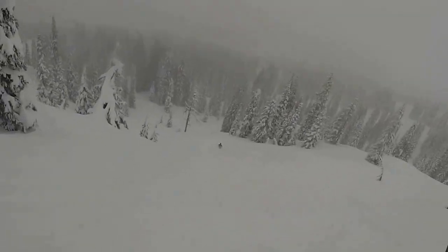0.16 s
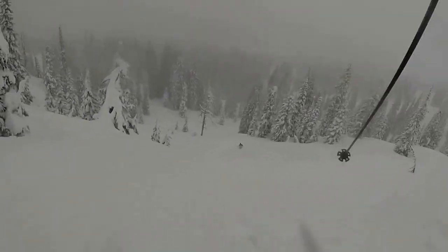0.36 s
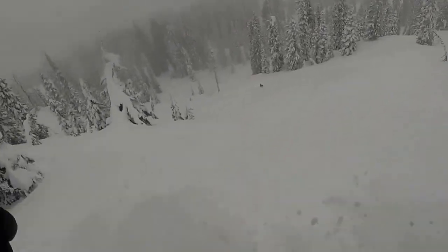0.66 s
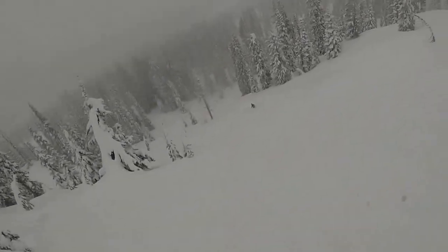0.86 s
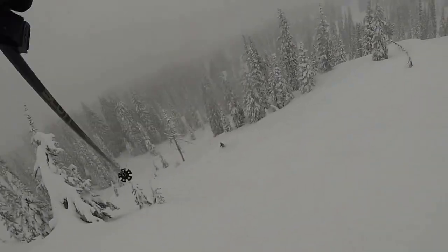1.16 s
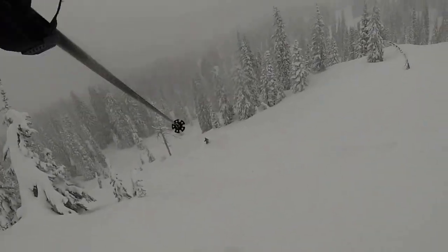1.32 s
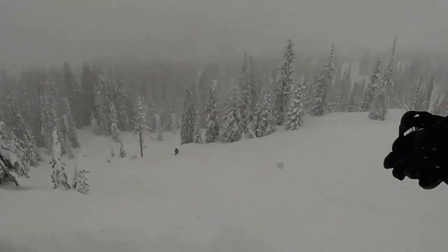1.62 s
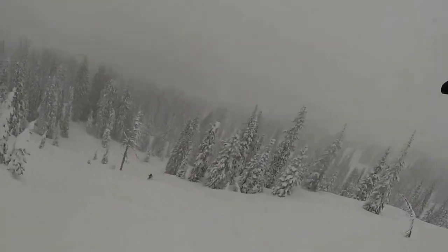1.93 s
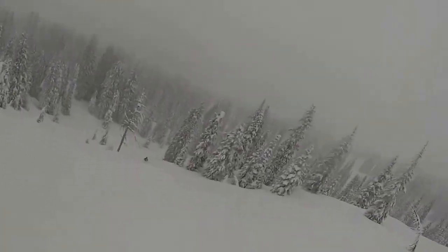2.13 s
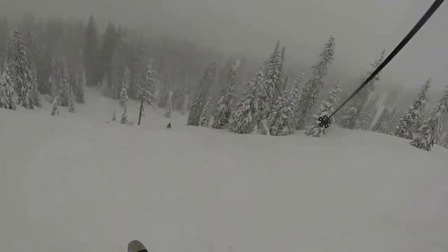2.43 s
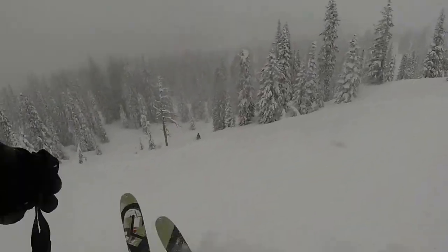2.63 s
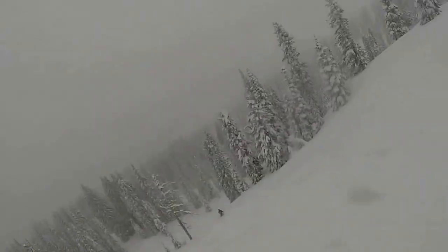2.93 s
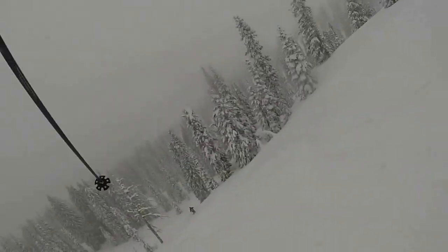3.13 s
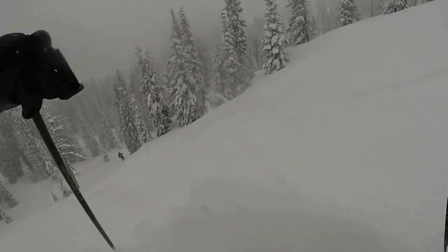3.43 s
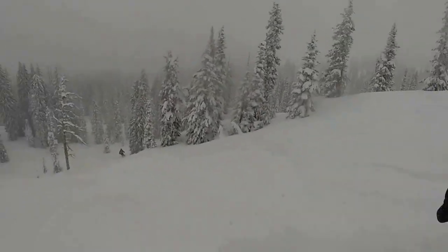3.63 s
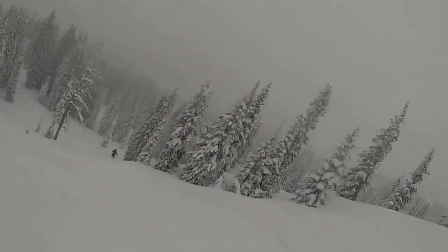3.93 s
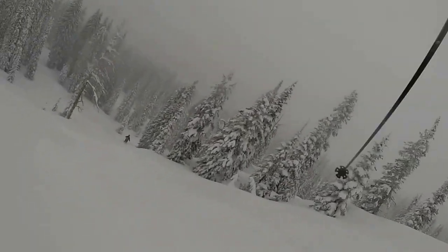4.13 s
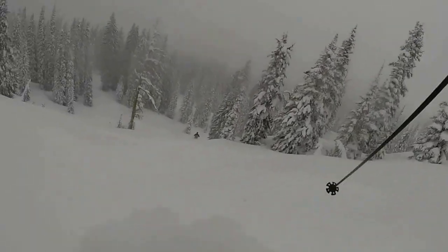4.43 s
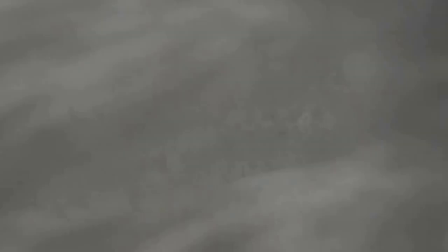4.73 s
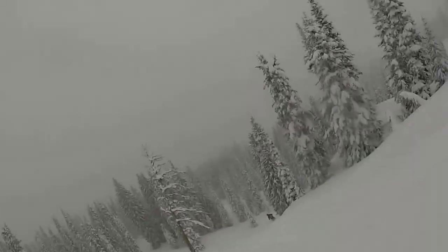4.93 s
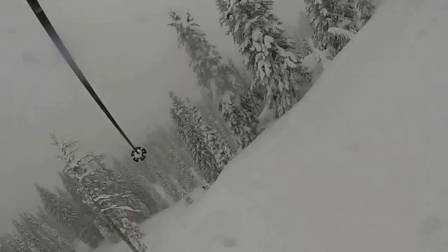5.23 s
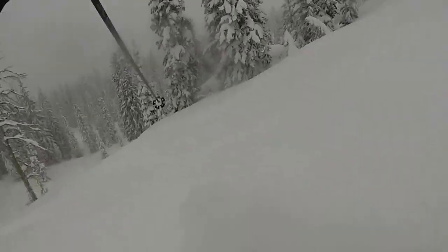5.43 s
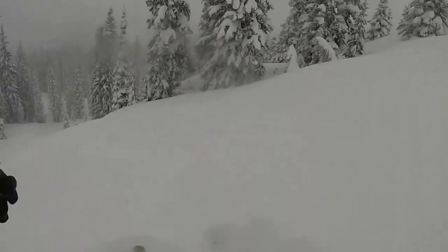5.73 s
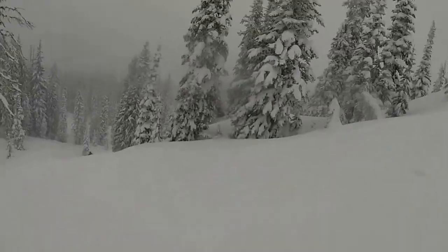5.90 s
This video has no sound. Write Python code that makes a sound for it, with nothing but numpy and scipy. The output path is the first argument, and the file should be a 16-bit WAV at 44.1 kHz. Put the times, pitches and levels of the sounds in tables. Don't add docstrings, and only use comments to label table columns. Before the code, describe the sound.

Close, boxy sound from inside a plastic case on a skier's helmet. Low wind buffets and flutters while skis swish softly through powder. Tiny icy ticks scatter throughout. A loud, dry knock from the loose mount comes about once a second, briefly ducking everything. Snow sprays hiss and patter near two, three and, strongest, just before five seconds, with soft thuds.

```python
import sys
import numpy as np
from scipy import signal
from scipy.fft import rfft, irfft
from scipy.io import wavfile
from scipy.ndimage import uniform_filter1d

SR = 44100
rng = np.random.default_rng(int(sys.argv[2]) if len(sys.argv) > 2 else 0)


def pcm_store(signal):
    levels = np.round(np.clip(np.atleast_2d(signal), -1, 1) * 32767)
    wavfile.write(sys.argv[1], SR, levels.astype(np.int16).T)


def invert_db(x):
    u = np.asarray(x, float) / 20
    return 10 ** u


N = 267246
TIME = np.arange(N) / SR

# (time [s], level [dB])
WIND = [(0, -28.5), (.47, -44.5), (.61, -26), (.78, -29.5), (.97, -40.5), (1.14, -36), (1.7, -36),
        (2.1, -39), (2.68, -38), (2.9, -30.5), (3.2, -31.5), (3.55, -47), (3.83, -33), (4.5, -43.5),
        (4.9, -25), (5.3, -32), (5.7, -42.5), (6.06, -30)]
# (time [s], hold [s], level [dB])
PUFFS = [
    (1.72, 0.12, -28),
    (2.42, 0.056, -27),
    (2.86, .04, -25.5),
    (4.12, 0.14, -32.5),
    (4.5, 0.064, -34.5),
    (5.27, .03, -26),
    (5.49, 0.068, -34),
    (5.81, 0.022, -35),
    (5.95, .02, -34),
]
# (time [s], level [dB])
HEAD_SHAKE = [(0, -54), (.2, -61), (.47, -52.5), (.97, -50), (1.37, -51), (1.62, -61), (2.09, -48),
              (2.3, -43.5), (2.5, -65), (2.83, -50), (3.25, -43), (3.55, -65), (3.73, -51), (4.25, -51),
              (4.59, -57), (5.0, -46.5), (5.28, -46), (5.55, -58), (5.89, -51), (6.06, -31.5)]
# (time [s], hold [s], boom level [dB], flutter level [dB])
JOLTS = [(0, 0.012, -25, -35.5), (2, 0.011, -35, -55), (1.85, 0.0088, -37.5, -40), (3, 0.03, -33, -39),
         (3.02, 0.015, -32.5, -57), (3.83, 0.013, -60, -47), (4, 0.022, -46, -45), (4.76, 0.12, -33.5, -38),
         (5.0, 0.12, -33, -43), (5, 0.021, -34.5, -48), (1.5, .02, -45, -49), (2.21, 0.016, -48, -50),
         (2.5, 0.026, -37, -43.5), (5.5, 0.038, -32, -43.5), (6, .05, -36, -38.5), (5, 0.034, -42, -44),
         (3.5, 0.026, -48.5, -56), (1.9, 0.035, -44, -44.5)]
# (time [s], swish level [dB])
SKI_PRESSURE = [(0, -38.5), (.17, -53), (.5, -47.5), (.9, -46.5), (1.3, -46.5), (1.85, -44), (2.3, -40),
                (2.5, -51.5), (2.85, -48.5), (3.2, -44), (3.55, -49), (3.75, -43), (4.24, -46.5),
                (4.67, -40.5), (5.2, -36), (5.5, -41), (5.87, -49), (6.03, -44)]
# (time [s], hold [s], swish level [dB], patter level [dB])
SPRAYS = [(.42, 0.021, -52, -53), (.545, 0.072, -41.5, -58), (.86, 0.019, -57, -54),
          (1.18, 0.023, -41, -58), (1.53, 0.013, -45, -52), (1.882, 0.046, -31, -29),
          (1.95, 0.072, -45, -39), (2.16, 0.056, -47, -43), (2.39, 0.0078, -29, -54),
          (2.66, .03, -44.5, -68), (2.765, 0.017, -44, -52), (2.892, 0.08, -30, -32.5),
          (3.1, 0.043, -36.5, -38), (3.15, 0.074, -42, -42.5), (3.33, 0.0095, -39, -64),
          (3.58, 0.0083, -39.5, -44), (3.632, 0.055, -40, -36.5), (3.75, 0.27, -57, -44),
          (4.0, 0.15, -40.5, -36), (4.17, 0.06, -43.5, -41), (4.33, 0.0098, -47, -62),
          (4.41, 0.068, -40, -64), (4.545, 0.017, -41, -52), (4.716, 0.012, -24, -27),
          (4.733, 0.1, -26.5, -24.5), (4.925, 0.034, -28.5, -25), (5.1, 0.29, -61, -39.5),
          (5.4, 0.081, -54, -42.5), (5.67, 0.068, -48, -42.5), (5.94, 0.12, -46.5, -71)]
# (time [s], hold [s], swish level [dB], patter level [dB])
SURGES = [(1.915, 0.017, -35, -33.5), (2.062, 0.014, -48, -43), (2.905, .012, -32, -27.5),
          (2.938, .008, -35, -29), (4.738, .016, -24, -20), (4.767, 0.014, -26, -25),
          (4.806, 0.018, -22.5, -19.5), (4.856, 0.011, -26.5, -24.5), (4.878, .025, -35, -34),
          (4.924, .012, -27, -21.5), (4.964, .022, -33, -28.5), (3.0, 0.064, -40, -42)]
# (frequency [Hz], width [Hz], level [dB])
CAVITIES = [(900, 1460, -4), (1760, 580, 1.1), (2570, 920, -2.5), (3250, 690, -1.6), (4160, 250, -6),
            (5140, 580, -3.5), (6130, 660, -7.5), (8930, 1300, -7.5), (11000, 4400, -3), (13800, 4700, -18)]
# (time [s], peak level [dB], frequency [Hz], t60 [s])
CLODS = [(.616, -24, 424, 0.026), (2.962, -9, 174, 0.043), (2.987, -0.5, 194, 0.016),
         (3.728, -15.5, 185, 0.041), (4.824, -8.5, 124, 0.036), (4.9519, 11.5, 142, 0.023),
         (5.514, -24.5, 393, 0.038), (0, -24, 302, .02), (.744, -34, 400, .02), (1.12, -33, 400, .02),
         (1.762, -31, 400, 0.022), (2.016, -30, 352, .02), (2.134, -26, 450, 0.024),
         (2.17, -31, 366, 0.023), (2.222, -21, 423, 0.023), (2.327, -22, 454, .015),
         (2.404, -36, 330, 0.025), (2.694, -38, 330, .02), (2.913, -23, 350, .02), (3.006, -22, 300, .02),
         (3.73, -28, 860, .012), (3.819, -21.5, 345, 0.018), (3.834, -27, 400, 0.023),
         (3.893, -30, 377, .02), (3.955, -26, 380, .02), (4.03, -33, 353, 0.016), (4.475, -36, 600, .015),
         (4.617, -39, 400, .02), (4.674, -37, 800, .012), (4.73, -21, 350, .02), (5.015, -26, 280, .02),
         (5.33, -27, 380, 0.023), (5.729, -32, 400, 0.025), (5.831, -24, 398, 0.023),
         (4.425, -35, 650, .02), (4.437, -35, 1450, .015), (4.446, -32, 800, .02), (5.518, -34, 760, .015),
         (.297, -42, 900, .02), (5.93, -33, 930, 0.019), (5.996, -21, 497, .02), (6.048, -12, 2000, 0.0093)]

# (frequency [Hz], level [dB], t60 [s])
TICK_LOW_MODES = [(1710, -17, 0.0081), (2940, -19, 0.011), (4320, -9, 0.0036), (5400, -11, 0.0036)]
TICK_HIGH_MODES = [(6330, -6, 0.0037), (8560, 3.5, 0.0026), (11040, -2, 0.0028), (13700, -6, 0.0028)]
# (time [s], peak level [dB], brightness [dB])
LENS_TICKS = [(0.5493, -33, -6), (.6743, -27.5, -19), (.698, -27.5, -21), (.7673, -25.5, -13),
              (0.871, -40, -11), (1.2709, -30.5, -9), (1.2913, -25, -19), (1.3466, -19.5, -14),
              (1.5552, -31, -20), (1.7344, -28, -9.5), (1.875, -34, -5), (2.0401, -22, -11.5),
              (2.199, -21.5, -19), (2.546, -26.5, -22), (2.7304, -30.5, -25), (2.7545, -34, -14),
              (2.7577, -22.5, -10), (2.9093, -19, -14), (2.9438, -18.5, -13), (2.9753, -12, -9),
              (2.9761, -13, -12), (3.0787, -26.5, -7), (3.0963, -30, -28), (3.103, -28.5, -19),
              (3.195, -28.5, -6), (3.226, -30, -9), (3.5804, -26.5, -23), (3.655, -26.5, -12),
              (3.826, -30, -27), (3.961, -28.5, -15), (3.9897, -27, -14), (4.3421, -29.5, -10),
              (4.3163, -37.5, -6), (4.472, -30, -14), (4.6621, -25.5, -22), (4.7214, -16, -12),
                   (4.7235, -18, -14), (5.1797, -30.5, -1), (5.2385, -18, -10), (5.4746, -28, -24),
                   (5.799, -32, -9), (5.887, -47, 4), (4.398, -42, -20)]
# (time [s], peak level [dB], brightness [dB])
WALL_TICKS = [(0.0235, -31.5, -5), (0.045, -32, -7), (.248, -43, -3), (.3757, -35.5, -15),
              (0.5335, -34, -11), (.5564, -38, -1.5), (.7153, -40, -1), (0.9076, -32, -16),
              (.954, -30, -15), (1.1504, -33.5, -4.5), (1.183, -28, -11), (1.19, -43, -13),
              (1.2126, -33.5, -17), (1.503, -30.5, -7.5), (1.625, -34.5, -14), (2.1011, -25, -13),
              (2.322, -32, -2), (2.3487, -33, -23), (2.38, -42, -4), (2.86, -27, -14), (2.8995, -25, -11),
              (4.0104, -22, -29), (4.2868, -34, -8), (4.2977, -37, -8), (4.423, -38, -2), (4.579, -30, -5),
              (4.644, -31, -12), (4.705, -26, -4), (4.8577, -18.5, -21), (5.728, -33, -2)]
# (time [s], peak level [dB], brightness [dB])
DOOR_TICKS = [(0.6238, -36, -24), (0.7325, -34, -20), (.747, -30, -15), (1.3097, -37, -15),
              (1.405, -39, -22), (1.8, -36, -8), (1.33, -41, -18), (0.293, -46, -27), (1.679, -44, -25),
              (1.716, -44, -25), (2.057, -42, -20), (2.2093, -33, -3), (2.2748, -32.5, -9),
              (2.8694, -36, -2), (4.582, -35, -2), (4.77, -25, 3), (5.358, -26.5, -28), (5.604, -28, -32),
              (5.8304, -32, -30), (5.8436, -35, -22)]
# (time [s], peak level [dB], brightness [dB])
RIM_TICKS = [(0.1053, -38.5, -4), (0.1147, -37, -16), (0.184, -39, -6), (.215, -55, 2), (0.446, -43, -15),
             (.8054, -45, 8), (.856, -42, 2), (0.832, -36, -10), (.889, -24.5, -6), (0.99, -37, 1),
             (1.204, -36, -9), (1.3962, -44, -3), (1.442, -36.5, -10), (1.549, -37, -8), (1.6096, -45, 0),
             (1.7694, -40, -20), (1.981, -29.5, -20), (2.089, -31, -11), (2.5727, -36, -10),
             (2.405, -47, 3), (2.6616, -50, 4.5), (2.7208, -47, 3), (3.505, -40, -20), (2.781, -36, -9),
             (3.3202, -49, -3), (3.5362, -37, -15), (3.616, -35, -24), (4.541, -34, -5), (5.5967, -49, 0),
             (5.931, -35, -17)]
# (time [s], peak level [dB])
DOOR_FLAKES = [(0.1048, -45), (0.2866, -43), (0.2949, -41.5), (0.4172, -46), (0.4543, -45), (0.4592, -44),
               (0.5616, -42), (0.6363, -39), (0.8556, -38.5), (1.074, -36.5), (1.1719, -49), (1.193, -30.5),
               (1.5242, -38), (1.549, -41), (1.69, -43), (1.7421, -43), (2.1099, -45), (2.135, -41),
               (2.2692, -33), (2.3277, -29), (2.3939, -42), (2.4056, -36), (2.519, -43), (2.5226, -51),
               (2.7136, -45), (2.8169, -43), (2.9431, -25), (3.0666, -32), (3.1846, -32.5), (3.4564, -50),
               (3.53, -47), (3.6153, -41), (3.6541, -32), (3.732, -37), (3.7873, -34), (4.1672, -35),
               (4.3349, -38), (4.5607, -40), (4.6742, -38), (5.2462, -31), (5.3541, -32), (5.491, -34.5),
               (5.902, -45), (5.927, -38), (5.9973, -34.5)]
LENS_FLAKES = [(0.1, -51), (0.1353, -56), (0.187, -53), (0.3685, -47), (0.5855, -43), (0.6088, -44),
               (0.6325, -45), (0.848, -38), (0.8855, -42), (1.0046, -43), (2.074, -37), (2.1563, -34),
               (2.28, -31), (2.4101, -45), (2.4638, -48), (2.5204, -52), (2.5995, -55), (3.359, -49),
               (3.4097, -43), (3.4292, -48), (3.51, -42), (4.136, -31.5), (4.2356, -35), (4.2469, -39),
               (4.3107, -41), (4.3796, -47), (4.4006, -41), (4.5929, -39), (5.368, -41), (5.71, -35.5),
               (5.9705, -39)]
RIM_FLAKES = [(0.1106, -49), (0.2363, -59), (0.255, -56), (0.2717, -56), (0.363, -52), (0.9695, -54),
              (1.0417, -50), (1.1023, -51), (1.1407, -52), (1.2618, -53), (1.2664, -52), (1.5006, -43),
              (1.7296, -49), (1.7621, -51), (2.179, -39), (2.3589, -55), (2.4534, -61), (2.4836, -64),
              (2.5378, -58), (2.568, -51), (2.6178, -63), (2.7266, -49), (2.7537, -51), (2.7667, -44),
              (2.8844, -36), (3.3471, -59), (3.578, -46), (4.2522, -46), (4.4343, -51), (4.4753, -54),
              (5.6199, -48), (5.7026, -43), (5.8205, -51), (5.8271, -50)]

# (time [s], peak level [dB])
KNOCKS = [
    (.0771, -.7),
    (1.3629, -.9),
    (2.3428, -.7),
    (3.2715, -.7),
    (4.2686, -.7),
    (5.2749, -1),
    (6.0469, -3.3),
]
LATCH_RATTLES_DB = [
    -2,
    8,
    1.5,
    2,
    3,
    1,
    4,
]
# (frequency [Hz], level [dB], t60 [s])
KNOCK_MODES = [(127, -7, .0071), (175, -26.5, .09), (630, -22, .016), (1573, -9.3, .0056),
               (1875, -27.7, .026), (2564, -2.8, .0042), (3590, -17, .006), (4120, -6.8, .0031),
               (6060, -24.7, .0062), (6340, -25.4, .0067), (8700, -24, .002), (11700, -9, .0015)]
# (frequency [Hz], level [dB], t60 [s])
LID_MODES = [(2153, -1.9, .0032), (4250, -1.9, .001)]
# (time [s], peak level [dB])
LUMPS = [
    (2.8533, -4),
    (2.8542, -4.5),
    (2.8548, -9),
]
# (frequency [Hz], level [dB], t60 [s])
LUMP_MODES = [(170, -22, .04), (1750, -16, .013), (2550, -8, .005), (3350, -4, .0045), (4400, -13, .004),
              (5960, -16, .004), (8350, -28, .004), (11100, -25, .0025), (14390, -25, .0021)]

LENS_HZ, WALL_HZ, DOOR_HZ, RIM_HZ = 5120, 3300, 2400, 6130
HARD_CONTACT_S = .00016


def unit(x):
    return x / np.sqrt(np.mean(x ** 2))


def band(x, lo_hz, hi_hz, order=2):
    return signal.sosfilt(signal.butter(order, [lo_hz, hi_hz], "band", fs=SR, output="sos"), x)


def walk(rate_hz):
    hold = int(SR / rate_hz)
    steps = np.repeat(rng.standard_normal(N // hold + 1), hold)
    return unit(uniform_filter1d(steps, hold)[:N])


def curve(table):
    return invert_db(np.interp(TIME, *np.transpose(table)))


def bursts(table, rise_db_s, fall_db_s):
    power = 0
    for s, hold_s, *db in table:
        attack_db = -rise_db_s * np.maximum(s - TIME, 0)
        release_db = -fall_db_s * np.maximum(TIME - s - hold_s, 0)
        power = power + invert_db(2 * np.array(db))[:, None] * invert_db(2 * (attack_db + release_db))
    return np.sqrt(power)


def ring(modes, rise_s):
    t = TIME[:int(SR * max(t60 for _, _, t60 in modes))]
    body = sum(invert_db(db) * np.cos(2 * np.pi * hz * (t - rise_s)) * 1000 ** (-t / t60) for hz, db, t60 in modes)
    return body * np.sin(np.pi / 2 * np.minimum(t / rise_s, 1)) ** 2


def add(out, s, sound):
    i = int(s * SR)
    out[i:i + len(sound)] += sound[:len(out) - i]
    return out


def duck():
    lookahead_s = 0.017
    fast_db, fast_s = -1, 0.014
    slow_db, slow_s = -7.5, 0.21
    db = np.zeros(N)
    for s, _ in KNOCKS:
        after = np.maximum(TIME - s, 0)
        closing = np.clip(1 + (TIME - s) / lookahead_s, 0, 1) ** 0.39
        db += closing * (fast_db * np.exp(-after / fast_s) + slow_db * np.exp(-after / slow_s))
    return invert_db(db)


def wind():
    jolt_rise_db_s, jolt_fall_db_s = 236, 216
    boom_hz, boom_width_hz = 147.2, 42
    ducked = duck()
    shaking = curve(HEAD_SHAKE)
    jolt_boom, jolt_flutter = bursts(JOLTS, jolt_rise_db_s, jolt_fall_db_s)
    puffs = bursts(PUFFS, jolt_rise_db_s, jolt_fall_db_s)[0]
    buffet_gain = np.hypot(curve(WIND), puffs) * ducked ** 1.9
    boom_gain = np.hypot(invert_db(-4) * shaking ** 0.77, jolt_boom) * ducked
    flutter_gain = np.hypot(shaking, jolt_flutter) * ducked

    gust = walk(30)
    buffet = band(rng.standard_normal(N), 9.7, 45, order=4)
    gusty = rng.standard_normal(N) * invert_db(1.84 * gust)
    boom = band(gusty, boom_hz - boom_width_hz, boom_hz + boom_width_hz)
    flutter = band(rng.standard_normal(N) * invert_db(1.6 * gust + 2.8 * walk(70)), 210, 500)
    out = buffet_gain * unit(buffet) * invert_db(1.0)
    out = out + boom_gain * unit(boom) * invert_db(0.23)
    return out + flutter_gain * unit(flutter) * invert_db(0.2)


def crystals(rate_hz, scatter_db):
    chance = rng.random((2, N))
    size = invert_db(-scatter_db * np.log(1.03 - chance[1])) * np.sign(rng.standard_normal(N))
    return unit((chance[0] < rate_hz / SR) * size)


def split(x):
    hz = np.arange(N // 2 + 1) * SR / N
    below = [1 / (1 + (hz / edge_hz) ** 8) for edge_hz in (3650, 7300)]
    shares = below[0], below[1] - below[0], 1 - below[1]
    return [unit(irfft(rfft(x) * share, N)) for share in shares]


def snow_gains():
    rise_db_s, spray_fall_db_s, surge_fall_db_s = 1200, 313, 900
    skis = curve(SKI_PRESSURE)
    dust = skis ** 1.1
    sprays = bursts(SPRAYS, rise_db_s, spray_fall_db_s)
    surges = bursts(SURGES, rise_db_s, surge_fall_db_s)
    thrown_swish, thrown_patter = np.hypot(sprays, surges)
    swish = np.hypot(skis, thrown_swish)
    patter = np.hypot(invert_db(-4.5) * dust, thrown_patter)
    fizz = np.hypot(invert_db(-15.5) * dust, invert_db(-7.5) * thrown_patter)
    return duck() * np.array([swish, patter, fizz])


def snow():
    clumps_db = 1.1 * walk(45) + 2.3 * walk(150)
    fine = invert_db(-1.0) * crystals(1200, scatter_db=2.0)
    sparse = crystals(220, scatter_db=3.2)
    hiss = crackle = 0
    for hz, width_hz, db in CAVITIES:
        dense = invert_db(clumps_db + 2.0 * walk(110)) * (rng.standard_normal(N) + fine)
        struck = sparse * np.tanh(rng.standard_normal(N)) ** 3
        pair = invert_db(db) * band(np.array([dense, struck]), hz - width_hz / 2, hz + width_hz / 2, order=1)
        hiss, crackle = hiss + pair[0], crackle + pair[1]
    hiss_db, crackle_db = (-3.5, -4.5, -5.5), (-29, -28, -30.5)
    out = 0
    for gain, smooth, sharp, smooth_db, sharp_db in zip(
            snow_gains(), split(hiss), split(crackle), hiss_db, crackle_db):
        out = out + invert_db(smooth_db) * gain * smooth
        out = out + invert_db(sharp_db) * gain ** 0.59 * sharp
    return out


def clods():
    out = np.zeros(N)
    for s, db, hz, t60 in CLODS:
        modes = [(hz, 0, t60), (2.32 * hz, -3, t60 / 2)]
        add(out, s, -invert_db(db) * ring(modes, .85 / hz))
    return out


def ticks():
    grains = ((LENS_HZ, LENS_TICKS), (WALL_HZ, WALL_TICKS),
              (DOOR_HZ, DOOR_TICKS), (RIM_HZ, RIM_TICKS))
    flakes = ((DOOR_HZ, -23, DOOR_FLAKES), (LENS_HZ, -13, LENS_FLAKES), (RIM_HZ, 3.5, RIM_FLAKES))
    hits = [(s, db, hz, bright_db) for hz, rows in grains for s, db, bright_db in rows]
    return hits + [(s, db, hz, bright_db) for hz, bright_db, rows in flakes for s, db in rows]


def icy_grains():
    out, contact_s = np.zeros(N), .00036
    hits = ticks()
    spots = rng.standard_normal((len(hits), 8))
    for (s, db, hz, bright_db), spot in zip(hits, spots):
        high = [(f, g + bright_db, t60) for f, g, t60 in TICK_HIGH_MODES]
        modes = [(f * (1 + .04 * c), g + 3 * c, t60) for (f, g, t60), c in zip(TICK_LOW_MODES + high, spot)]
        panel = (hz, 0, 16.1 / hz)
        tick = invert_db(db + 8.0) * ring(modes + [panel], contact_s)
        add(out, s - contact_s, np.sign(spot[-1]) * tick)
    return out


def mount_knocks():
    out = np.zeros(N)
    lid = ring(LID_MODES, HARD_CONTACT_S)
    for (s, db), rattle_db in zip(KNOCKS, LATCH_RATTLES_DB):
        seat = rng.standard_normal(len(KNOCK_MODES))
        modes = [(hz, g + .6 * c + rattle_db * (hz > 7000), t60)
                 for (hz, g, t60), c in zip(KNOCK_MODES, seat)]
        knock = -add(ring(modes, HARD_CONTACT_S), 0, -lid)
        knock = uniform_filter1d(knock, size=3)
        add(out, s - HARD_CONTACT_S, invert_db(db) * knock)
    return out


def lump():
    out = np.zeros(N)
    for s, db in LUMPS:
        add(out, s - HARD_CONTACT_S, invert_db(db) * ring(LUMP_MODES, HARD_CONTACT_S))
    return out


def scene():
    blows = clods() + icy_grains() + mount_knocks() + lump()
    return (wind() + snow() + blows)[None]


def band_limit(x):
    return signal.sosfilt(signal.butter(12, 16460, fs=SR, output="sos"), x)


def record(dry):
    limited = np.clip(dry, -.97, .97)
    top_cut = signal.ellip(8, .2, 40, 15300, fs=SR, output="sos")
    return band_limit(signal.sosfilt(top_cut, limited))


dry = scene()
out = record(dry)
pcm_store(out)
```